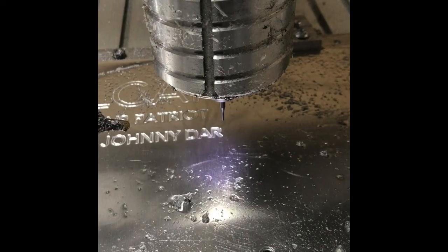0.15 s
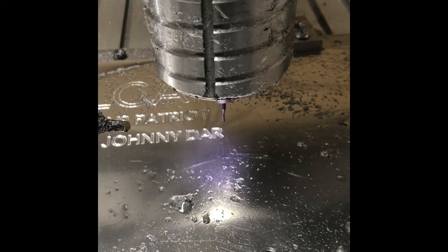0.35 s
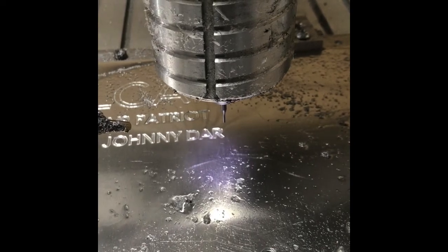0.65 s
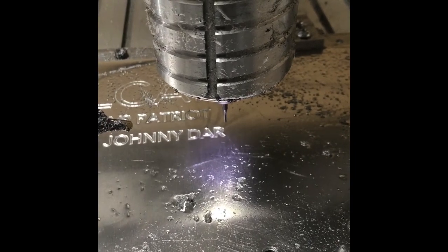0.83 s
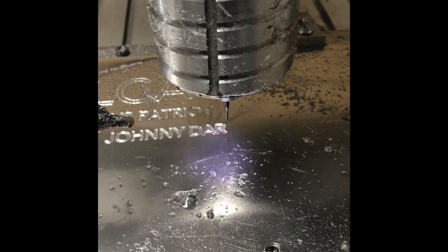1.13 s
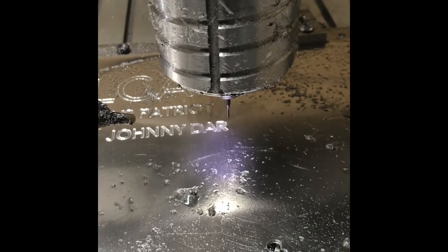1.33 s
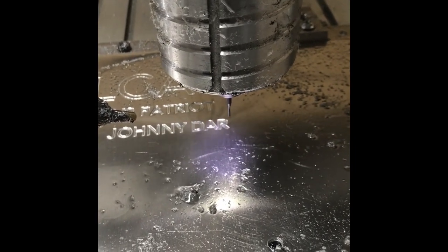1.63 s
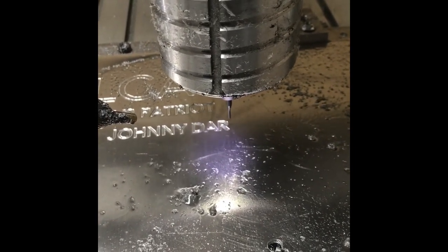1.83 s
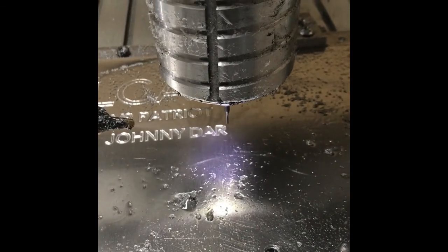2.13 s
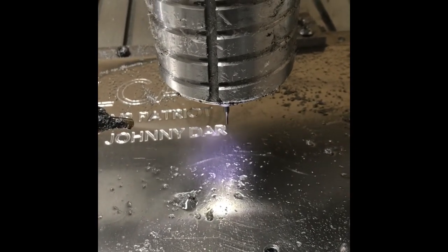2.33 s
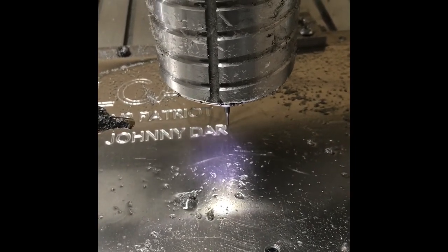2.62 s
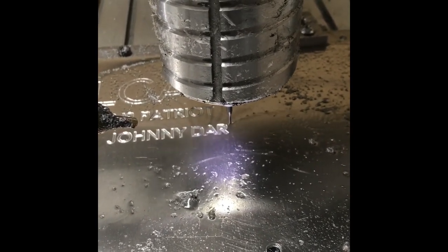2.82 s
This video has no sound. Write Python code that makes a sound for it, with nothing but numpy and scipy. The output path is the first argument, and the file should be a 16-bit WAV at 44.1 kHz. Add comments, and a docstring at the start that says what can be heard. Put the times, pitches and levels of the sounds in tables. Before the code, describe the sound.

An engraving spindle's high whine fades in close by with a few dry ticks, drops to silence at about 0.3 seconds and returns by 0.45. It holds steady over rushing air, the cutter scraping metal and a faint low hum. Around 1.5 seconds the level dips briefly with a soft thud. Near 2.8 seconds a short rasp swells and rises in pitch as the whine continues.

```python
"""An engraving spindle whines at about 27,000 rpm, close to a mono microphone, while its fine cutter
scrapes through a metal plate. Mains ripple puts side tones around the whine, cooling air rushes, and
the feed drive hums until the stroke ends with a rasp. The sound fades in with a few dry ticks, drops
to silence for a moment and comes back. Halfway through, the level dips briefly with a soft thud."""
import sys
import numpy as np
from scipy import signal
from scipy.fft import rfft, irfft, next_fast_len
from scipy.io import wavfile
from scipy.ndimage import uniform_filter1d, map_coordinates

SR = 44100
rng = np.random.default_rng(int(sys.argv[2]) if len(sys.argv) > 2 else 0)


def wav_record(signal):
    """Record a signal, one row per channel, as 16-bit PCM in the file named by sys.argv[1]."""
    frames = np.transpose(np.atleast_2d(signal))
    bounded = np.clip(frames, -1, 1)
    # unit amplitude maps onto the largest positive 16-bit level
    quanta = np.round(bounded * 32767).astype(np.int16)
    wavfile.write(sys.argv[1], SR, quanta)


N = 130977

RIPPLE_HZ = 120
DIP_S, DIP_DB = 1.529, -3.5
# Mains hum. Each row: time in seconds, level in dB.
HUM_LEVEL = [(.47, -39.5), (.78, -46.5), (1.0, -43.5), (1.57, -46.5), (2.1, -42), (2.53, -42.5),
             (2.66, -32), (2.81, -30), (2.96, -33)]


def amp(db):
    """Decibels to gain."""
    return 10 ** (np.asarray(db) / 20)


def unit(x):
    """Scale to rms 1."""
    return x / np.sqrt(np.mean(x ** 2) + 1e-20)


def clock():
    """Time of each sample in seconds."""
    return np.arange(N) / SR


def curve(rows):
    """Rows of seconds and value, joined by straight lines."""
    return np.interp(clock(), *np.transpose(rows))


def wobble(rate):
    """A smooth random curve, rate knots a second."""
    return map_coordinates(rng.standard_normal(8192), [clock() * rate], mode="wrap")


def filtered(x, response):
    """x through a filter given as gain against Hz."""
    size = next_fast_len(N + 8192)
    return irfft(rfft(x, size) * response(np.fft.rfftfreq(size, 1 / SR)), size)[:N]


def coloured(x, points):
    """x shaped by rows of Hz and dB, at rms 1."""
    freqs, db = np.transpose(points)
    return unit(filtered(x, lambda hz: amp(np.interp(np.log(hz + 1), np.log(freqs + 1), db))))


def tone(cycles, flutter_db=1, drift=.025):
    """A partial near rms 1 that flutters in level and drifts in phase (drift in cycles)."""
    flutter = amp(flutter_db * wobble(21.84))
    return np.sqrt(2) * flutter * np.sin(2 * np.pi * (cycles + rng.random() + drift * wobble(14)))


def spindle(turns):
    """The shaft whines at its orders, whole multiples of its turning rate."""
    # The orders that swell and fade. Each row: time in seconds, level in dB.
    order_1 = [(0.47, -26), (1.53, -25), (1.545, -23), (1.78, -23), (1.99, -25.5), (2.8, -24.5),
               (2.83, -31.5), (2.95, -29)]
    order_4 = [(0.47, -25), (1.34, -23.5), (1.48, -25), (1.97, -24.5), (2.3, -22), (2.56, -22.5),
               (2.95, -20)]
    order_5 = [(0.47, -28), (0.7, -29), (1.5, -30), (2.1, -29.5), (2.6, -30.5), (2.72, -38), (2.95, -36)]
    order_6 = [(0.47, -31), (1.41, -32.5), (2.6, -32.5), (2.7, -39.5), (2.95, -35)]
    order_7 = [(1.0, -32.5), (2.1, -38), (2.4, -34.5), (2.6, -35), (2.68, -47)]
    order_9 = [(.47, -48), (.8, -37), (1.1, -50), (2.0, -46), (2.87, -32.5)]
    order_12 = [(0.47, -27), (1.0, -27), (1.32, -26.5), (1.42, -30.5), (2.0, -30.5), (2.5, -33),
                (2.72, -25.5), (2.8, -34), (2.87, -25), (2.96, -31)]
    order_13 = [(0.48, -23), (1.04, -24), (2.02, -23), (2.89, -25), (2.95, -22.5)]
    order_24 = [(.47, -41), (1.0, -39), (2.3, -43), (2.55, -41), (2.7, -50)]
    order_26 = [(.47, -34.5), (1.0, -33.5), (1.9, -34.5), (2.7, -36), (2.95, -42)]
    # Weaker, steady orders. Each row: order, level in dB.
    steady_orders = [(2, -47.5), (3, -38), (8, -33.5), (10, -46), (16, -37.5), (18, -38)]
    lowest_db = curve(order_1) + DIP_DB * dip()  # sags further than the rest of the machine
    whine = amp(lowest_db) * tone(turns, flutter_db=.7, drift=.004)
    for order, level in [(4, order_4), (5, order_5), (6, order_6), (7, order_7), (9, order_9),
                         (13, order_13), (24, order_24), (26, order_26)]:
        whine += amp(curve(level)) * tone(order * turns, flutter_db=.54, drift=.012)
    whine += amp(curve(order_12)) * tone(12 * turns, flutter_db=.8, drift=.012)
    for order, db in steady_orders:
        whine += amp(db) * tone(order * turns, flutter_db=1.3, drift=.0018 * order)
    return whine


def side_tones(turns):
    """Mains ripple sets tones beside the shaft orders, whole ripple steps away."""
    # The main side tone, two steps above order 4. Each row: time in seconds, level in dB.
    main_level = [(.6, -34), (1.0, -35), (2.1, -35), (2.45, -30), (2.65, -36)]
    # Lesser side tones. Each row: shaft order, offset in ripple steps, level in dB.
    lesser_tones = [(3, 2, -47), (4, -1, -44.5), (5, -3, -47), (5, -1, -44.5), (5, 1, -45), (6, -2, -48.5),
                    (7, -2, -45), (7, 1, -35.5), (8, -3, -44.5), (8, 2, -38.5), (9, -2, -41.5)]
    # They weaken as the stroke ends. Each row: time in seconds, gain in dB.
    weakening = [(2.6, 0), (2.7, -2)]
    ripple = RIPPLE_HZ * clock()
    below_shaft_db = curve(HUM_LEVEL) - 14  # follows the hum
    tones = amp(below_shaft_db) * tone(turns - ripple, flutter_db=2.5, drift=.01)
    tones += amp(curve(main_level)) * tone(4 * turns + 2 * ripple)
    for order, steps, db in lesser_tones:
        swelling_db = db + curve(weakening) + 2 * wobble(5)
        tones += amp(swelling_db) * tone(order * turns + steps * ripple, flutter_db=1.2, drift=.02)
    return tones


def metallic_edge(turns, per_side=7, step_hz=30, stray_hz=5):
    """Faint, loosely spaced tones ring on both sides of the middle orders."""
    # Tone clusters. Each row: shaft order, typical level of one tone in dB.
    clusters = [(4, -50.5), (5, -49), (7, -52), (8, -51), (9, -49.5), (10, -51)]
    t, ring = clock(), np.zeros(N)
    for order, db in clusters:
        for step in range(-per_side, per_side + 1):
            if step:
                offset_hz = step * step_hz + stray_hz * rng.standard_normal()
                cycles = order * turns + offset_hz * t
                ring += amp(db) * rng.rayleigh() * np.sin(2 * np.pi * (cycles + rng.random()))
    return ring


def feed_drive(stop_s=2.81, release_s=.028):
    """The feed drive hums on fixed pitches until the stroke ends."""
    # Drive tones. Each row: frequency in Hz, level in dB.
    partials = [(180, -51.5), (212, -40), (318, -47.5), (471, -42)]
    t = clock()
    feeding = np.clip(1 - (t - stop_s) / release_s, 0, 1)
    return feeding * sum(amp(db) * tone(hz * t, flutter_db=.4, drift=.004) for hz, db in partials)


def mains_hum():
    """The mains ripple itself, heard as one low tone."""
    return amp(curve(HUM_LEVEL)) * tone(RIPPLE_HZ * clock(), drift=.005)


def cooling_air(turns, level_db=-19.5, patchy_db=.5, swirl_db=.25):
    """Slightly patchy rushing air, chopped by the rotor."""
    # Colour of the air and housing. Each row: frequency in Hz, relative level in dB.
    spectrum = [(25, -37.5), (60, -34), (82, -22.5), (105, -30), (150, -23.5), (238, -14), (265, -21),
                (380, -18), (540, -14.5), (680, -1.5), (810, -11.5), (950, -2.5), (1050, -6), (1130, -4),
                (1400, -3), (1600, -8), (1900, -12.5), (2600, -11.5), (3000, -8.5), (3230, -4),
                (3450, -10.5), (3900, -10), (4300, -4.5), (4700, -3), (4950, -7.5), (5250, 2), (5450, -6.5),
                (5650, -2.5), (6000, -9), (6250, -2.5), (6600, -5.5), (7200, -5.5), (7800, -10), (8500, -7),
                (9500, -13), (10000, -13), (10500, -17.5), (11000, -11.5), (11500, -9.5), (13000, -10),
                (14500, -14), (15700, -17.5)]
    # The rotor's chop. Each row: shaft order, depth as a fraction.
    rotor_chop = [(2, 0.045), (8, 0.042)]
    spectrogram = signal.stft(rng.standard_normal(N), nperseg=512)[2]
    patches = uniform_filter1d(rng.standard_normal(spectrogram.shape), size=7, axis=0)  # across pitch
    patches = uniform_filter1d(patches, size=10, axis=1)  # across time
    rush = signal.istft(spectrogram * amp(patchy_db * unit(patches)), nperseg=512)[1][:N]
    chop = 1 + sum(depth * np.sin(2 * np.pi * order * turns) for order, depth in rotor_chop)
    return amp(level_db + swirl_db * wobble(120)) * coloured(rush * chop, spectrum)


def cutter_scrape():
    """The tip rubs through the plate, and the friction noise rings the cutter's steep resonances."""
    # Cutter resonances. Each row: centre in Hz, width in Hz, relative level in dB.
    resonances = [(4364, 200, -2.5), (4650, 240, 1.5), (5190, 260, -0.5)]
    # Strength of the scrape. Each row: time in seconds, level in dB.
    level = [(.2, -25), (.9, -26.5), (1.35, -28), (1.55, -28.5), (2.1, -30), (2.5, -29), (2.95, -36)]

    def response(hz):
        return sum(amp(db) * (2j * hz * width / (centre ** 2 - hz ** 2 + 2j * hz * width)) ** 2
                   for centre, width, db in resonances)

    return amp(curve(level)) * unit(filtered(rng.standard_normal(N), response))


def ticks(width_s=.000055, low_cut_hz=600):
    """Very short, dry ticks without bass."""
    # Each row: time of a tick in seconds, peak in dB ahead of the low cut.
    peaks = [(.0955, 1.5), (.129, -5), (.1623, -2), (.1668, -6), (.1712, -8), (.2285, -7), (.4672, -1),
             (.5005, -8)]
    pulses = sum(amp(db) * np.exp(-((clock() - at_s) / width_s) ** 2) for at_s, db in peaks)
    return filtered(pulses, lambda hz: (1j * hz / (low_cut_hz + 1j * hz)) ** 2)


def dip(width_s=.009):
    """The bell shape of the brief sag in level, from 0 to 1."""
    return np.exp(-((clock() - DIP_S) / width_s) ** 2)


def thud(gain_db=-31, width_s=.0025):
    """One soft, low thud during the brief dip in level."""
    offset = (clock() - DIP_S) / width_s
    return amp(gain_db) * (np.exp(-offset ** 2) - np.exp(-(offset / 2) ** 2) / 2)


def cutter_rasp(width_hz=250):
    """The tip rasps as the stroke ends: a narrow band of noise that swells and climbs in pitch."""
    # Pitch of the rasp. Each row: time in seconds, centre in Hz.
    pitch = [(2.74, 1880), (2.83, 2130), (2.96, 2050)]
    # Its swell. Each row: time in seconds, level in dB.
    level = [(2.35, -55), (2.64, -34), (2.71, -32), (2.77, -23), (2.82, -26), (2.86, -31), (2.96, -36)]

    def shiver():
        return filtered(rng.standard_normal(N), lambda hz: 1 / (1 + (hz / width_hz) ** 2))

    phase = 2 * np.pi * np.cumsum(curve(pitch)) / SR
    return amp(curve(level)) * unit(shiver() * np.cos(phase) + shiver() * np.sin(phase))


def scene():
    """The whole machine from close by, alike in both channels."""
    # Shaft speed. Each row: time in seconds, turns a second.
    shaft_speed = [(0, 450.4), (.25, 450.5), (.46, 450.6), (.63, 451.4), (.95, 450.5), (1.15, 450.85),
                   (1.27, 450.45), (1.45, 452), (1.67, 452.95), (1.82, 452.2), (2.15, 451.3), (2.4, 450.65),
                   (2.73, 450.45), (2.96, 451.4)]
    # The fade-in, the moment of silence and the return. Each row: time in seconds, gain in dB.
    fades = [(.07, -80), (.076, -30), (.088, -18), (.11, -6.5), (.14, -1.5), (.255, -0.5), (.27, -3.5),
             (.286, -20.5), (.298, -31.5), (.32, -50), (.328, -110), (.396, -110), (.404, -43.5),
             (.42, -26), (.438, -16), (.448, -1.5), (.47, -0.54)]
    turns = np.cumsum(curve(shaft_speed)) / SR
    whine = spindle(turns) + side_tones(turns) + metallic_edge(turns)
    machine = whine + feed_drive() + mains_hum() + cooling_air(turns)
    machine += cutter_scrape() + ticks() + cutter_rasp()
    mono = amp(curve(fades) + DIP_DB * dip()) * machine + thud()
    return np.array([mono, mono])


def record(dry, top_hz=15780):
    """The microphone's band ends in a steep treble cut, 100 Hz wide."""
    return np.array([filtered(ch, lambda hz: np.clip((top_hz - hz) / 100 + .5, 0, 1)) for ch in dry])


dry = scene()
out = record(dry)
wav_record(out)
```